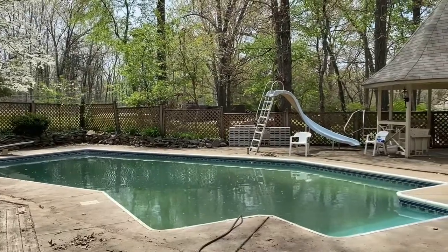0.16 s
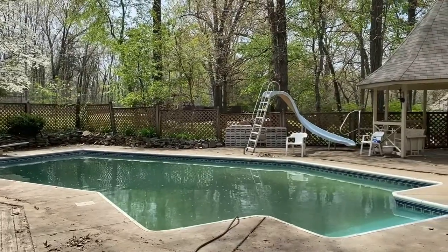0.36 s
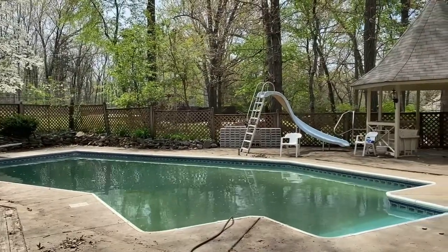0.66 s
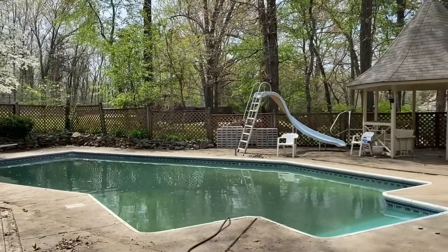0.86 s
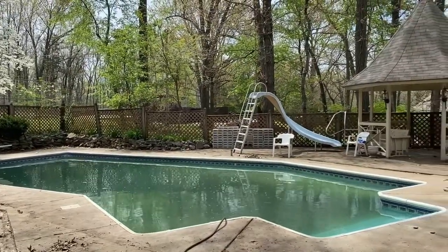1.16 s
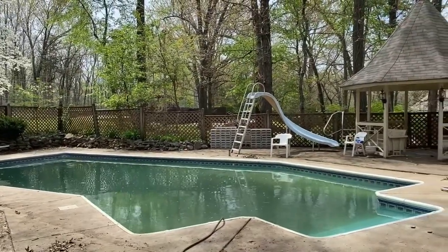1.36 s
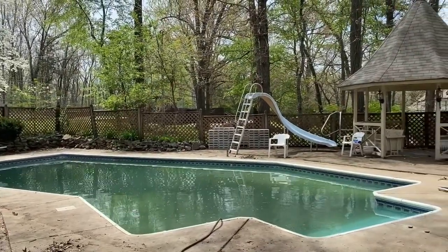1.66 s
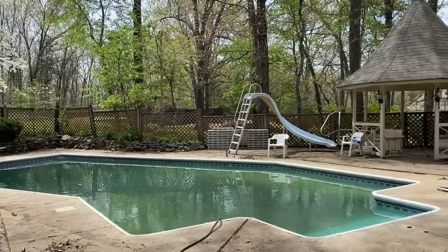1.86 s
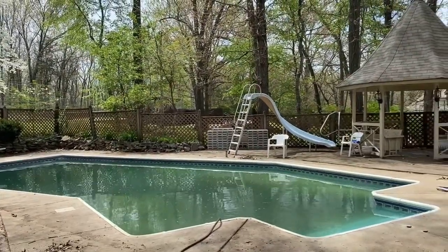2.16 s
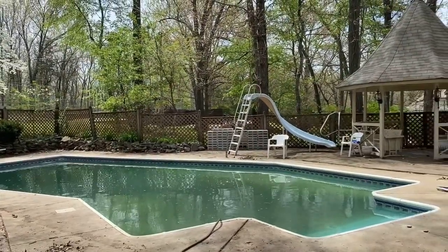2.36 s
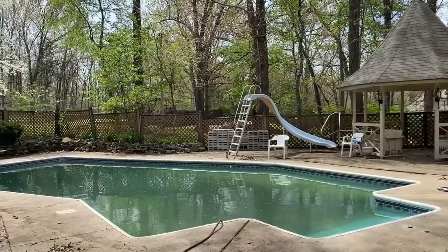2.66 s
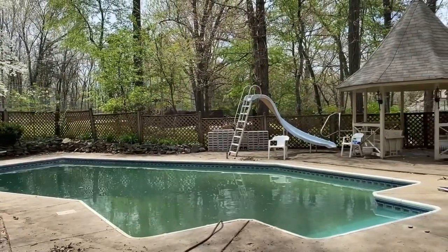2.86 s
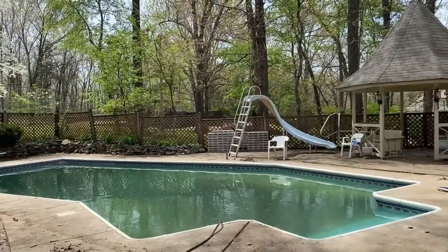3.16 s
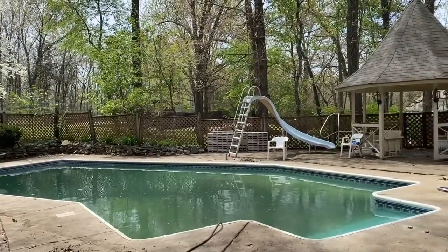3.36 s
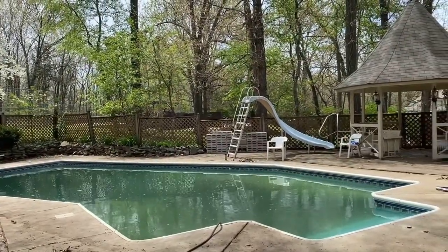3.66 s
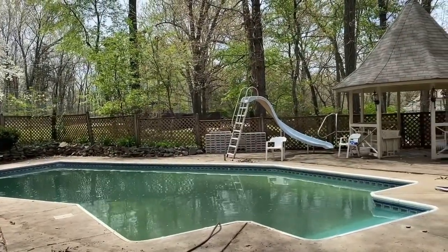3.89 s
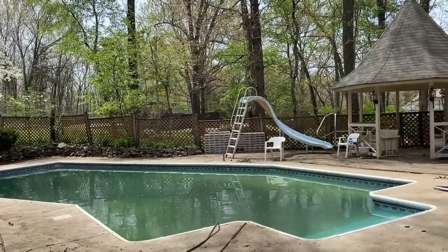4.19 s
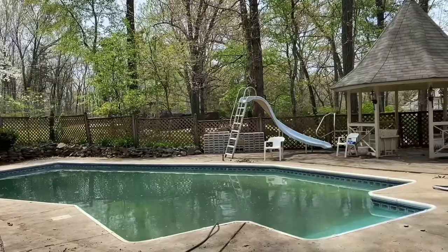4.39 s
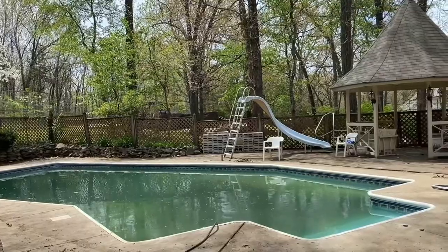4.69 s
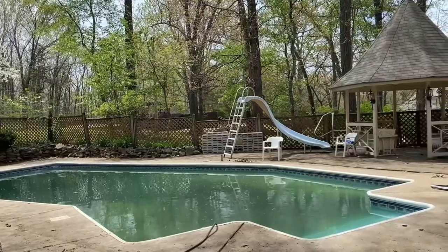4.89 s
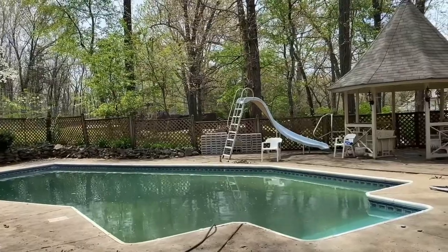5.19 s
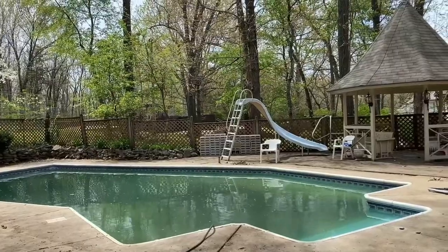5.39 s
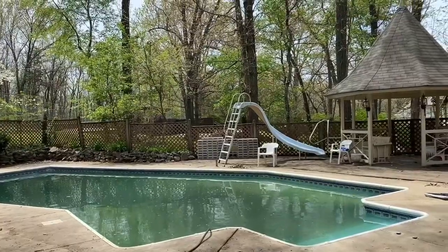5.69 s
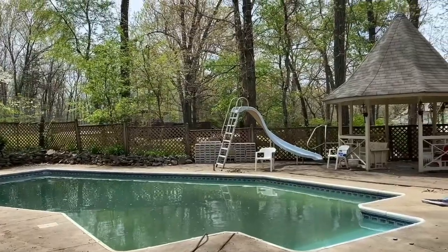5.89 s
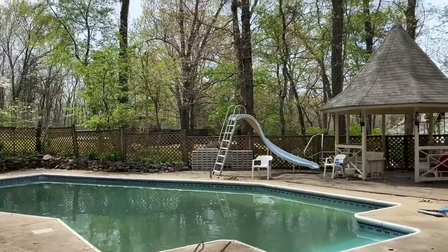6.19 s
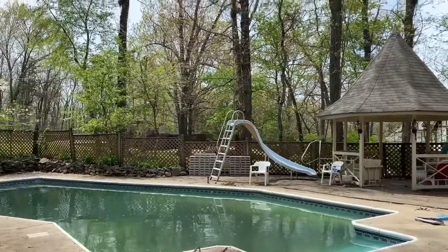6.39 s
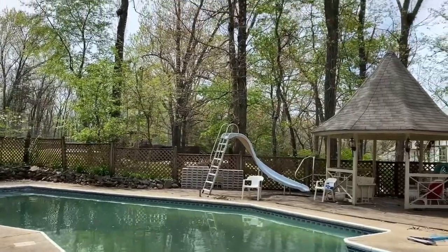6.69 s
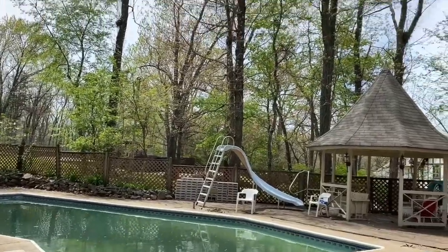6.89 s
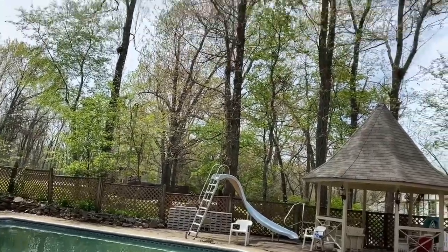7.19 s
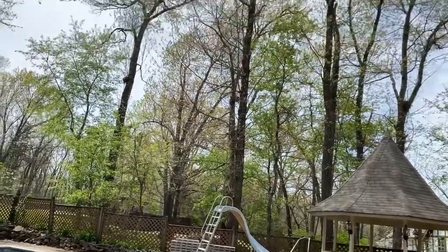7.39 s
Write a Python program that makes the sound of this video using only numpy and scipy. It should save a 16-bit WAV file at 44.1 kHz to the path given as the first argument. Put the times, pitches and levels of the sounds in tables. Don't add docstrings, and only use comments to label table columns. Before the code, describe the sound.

Unbroken, high whistling toad trills, one lower and nearer, one faster and higher, echo off trees above a soft distant engine and traffic rumble.

```python
import sys
import numpy as np
from scipy import signal
from scipy.fft import rfft, irfft, next_fast_len
from scipy.io import wavfile
from scipy.ndimage import uniform_filter1d

SR = 44100
rng = np.random.default_rng(int(sys.argv[2]) if len(sys.argv) > 2 else 0)


def waveform_to_disk(signal):
    frames = np.transpose(np.atleast_2d(signal))
    scaled = np.clip(frames, -1, 1) * 32767
    samples = np.round(scaled).astype(np.int16)
    wavfile.write(sys.argv[1], SR, samples)


def gain_from_db(level_db):
    decades = np.asarray(level_db, float) / 20
    return 10 ** decades


N = 332756

# start_s, left_minus_right_db, toad_overtone_db, far_toad_direct_db
PHONE_SWING = [
    (0, 0, -3, -2),
    (2.3, 0, -2, -1),
    (3, -0.5, 0, 0),
    (6, 0, -1.5, 1.5),
    (6.6, .3, -3, -1),
    (7.0, .7, -8, 5.5),
    (7.55, 2.5, -10, 3.5),
]


def evened(x):
    return x / np.sqrt(np.mean(x ** 2) + 1e-20)


def columns(rows, at):
    key, *rest = np.transpose(rows)
    return [np.interp(at, key, column) for column in rest]


def add(mix, start_s, sound):
    part = mix[round(start_s * SR):][:len(sound)]
    part += sound[:len(part)]


def ports(x, lead_us, pan_db):
    size = next_fast_len(N)
    turn = np.exp(1j * np.pi * np.fft.rfftfreq(size, 1 / SR) * lead_us * 1e-6)
    z = rfft(x, size)
    left = z * turn * gain_from_db(pan_db / 2)
    right = z / turn / gain_from_db(pan_db / 2)
    return irfft(np.array([left, right]), size)[:, :N]


def fuzzy(hz, width_hz):
    noise = [1, 1j] @ rng.standard_normal((2, N))
    slow = signal.lfilter([1], [1, -np.exp(-np.pi * width_hz / SR)], noise)
    carrier = np.exp(2j * np.pi * np.cumsum(hz * np.ones(N)) / SR)
    return evened((slow * carrier).real)


def breeze(t):
    # peak_s, fine_leaves_db, broad_leaves_db
    puffs = [(0.02, 6.5, 4), (1.0, 8, 5.5), (1.561, 6, 0.5), (2.15, 1.5, 2.5), (2.58, 4, 5),
             (3.2, 4.5, 2.5), (3.801, 3, 1), (4.5, 4.5, 2), (5.03, 5.5, 3.5), (5.5, 1, 1), (5.85, 3.5, 4),
             (6.05, 4, 6), (6.23, 4.5, 0.5), (6.45, 5, 5.5), (6.65, 5.5, 5), (7.16, 3, 4), (7.35, 2, -0.5),
             (7.5, 1, -1), (0.38, 1, -0.5), (4.1, 4, 2.5)]
    rise_s, fall_s, flicker_db = 0.061, 0.12, 2.5
    late = t[:, None] - np.transpose(puffs)[0]
    shape = np.exp(-(late / np.where(late < 0, rise_s, fall_s)) ** 2)
    swell_db = shape @ np.array(puffs)[:, 1:]
    flicker = evened(uniform_filter1d(rng.standard_normal((len(t), 2)), size=13, axis=0))
    return (swell_db - swell_db.mean(0) + flicker_db * flicker * [1, .4]).T


def wash(spectrum, patchy_db, gust_db, size):
    # pitch_hz, difference_to_sum_db, phase_radians, share_tied_to_sum (0 to 1)
    port_match = [(40, -58.5, 2.2, 0.62), (122, -21.5, 2.4, 0.65), (288, -12, 3.8, 0.35),
                  (527, -2, 2, 0.19), (995, -2.5, 2.5, 0.12), (2600, -5, 1.8, 0.45), (4970, -1, 1.3, 0.63),
                  (7460, 7, 1.6, .4), (9000, 20, 1.5, 0.071), (11100, 11, 1.6, 0.043),
                  (13600, -0.5, 1.6, .1)]
    frames, hz = 4 * N // size + 5, np.fft.rfftfreq(size, 1 / SR)
    a, b, c, d, patch = rng.standard_normal((frames, len(hz), 5)).T
    patch = uniform_filter1d(patch, size=12, axis=0)
    patch = evened(uniform_filter1d(patch, size=10, axis=1))

    fine_db, broad_db = breeze(np.arange(frames) * size / 4 / SR)
    gust = fine_db * np.interp(hz, [3200, 4800, 7500, 12000], [0, .6, 1, .8])[:, None]
    gust = gust + broad_db * np.interp(hz, [1800, 2600, 3500, 4500], [.3, 1, 1, 0])[:, None]

    def read_by_pitch(rows):
        return columns([(np.log(f), *rest) for f, *rest in rows], np.log(hz + 1)[:, None])

    side_db, angle, tied = read_by_pitch(port_match)
    tied = np.clip(tied, 0, 1)
    mid = a + 1j * b
    side = tied * np.exp(1j * angle) * mid + np.sqrt(1 - tied ** 2) * (c + 1j * d)
    side = gain_from_db(side_db) * side
    level_db = read_by_pitch(spectrum)[0] + patchy_db * patch + gust_db * gust
    z = np.array([mid + side, mid - side]) * gain_from_db(level_db)
    sound = signal.istft(z, nperseg=size, noverlap=3 * size // 4)[1][:, :N]
    return sound / np.sqrt(size) * gain_from_db(21)


def traffic():
    # pitch_hz, level_db (per Hz)
    rumble = [(20, -102.5), (40, -75), (60, -55), (80, -38), (105, -42), (135, -48.5), (165, -50),
              (250, -55), (400, -61.5), (700, -64.5), (1000, -68.5), (1400, -67.5), (2200, -111),
              (4000, -160)]
    return wash(rumble, patchy_db=0.7, gust_db=0, size=2048)


def leaves():
    # pitch_hz, level_db (per Hz)
    hiss = [(900, -97), (1500, -92.5), (2300, -65.5), (3200, -72), (4200, -80), (5200, -80), (6500, -91.5),
            (7700, -100), (8500, -110), (11000, -112), (12500, -111), (14300, -111), (15800, -140)]
    return wash(hiss, patchy_db=2.0, gust_db=1.0, size=512)


def motors():
    # start_s, firing_rate_hz, level_db, double_rate_level_db
    engine_run = [(0, 122, -55, -79), (1.3, 130.1, -51, -74), (2.2, 131.8, -51, -73.5),
                  (3.6, 135.6, -54, -80.5), (5.2, 136.9, -53, -65.5), (6.2, 139, -54.5, -68),
                  (6.32, 140.6, -55, -56), (6.5, 140.8, -53, -53), (6.78, 140.4, -52.5, -56),
                  (6.95, 141.1, -55.5, -64.5), (7.55, 139.9, -49.5, -63)]
    # pitch_hz, width_hz, level_db
    pump_tones = [
        (60.53, 17, -48),
        (345.8, 10, -64),
        (635, 6.5, -73),
        (697, 3.5, -81),
    ]
    t = np.arange(N) / SR
    hz, first_db, second_db = columns(engine_run, t)
    double = np.sin(4 * np.pi * np.cumsum(hz) / SR) + 0.22 * fuzzy(2 * hz, 9)
    hum = gain_from_db(first_db) * fuzzy(hz, 6.5) + gain_from_db(second_db) * double
    for pitch_hz, width_hz, db in pump_tones:
        steady = np.sin(2 * np.pi * pitch_hz * t)
        hum = hum + gain_from_db(db) * (0.75 * fuzzy(pitch_hz, width_hz) + 0.65 * steady)
    return signal.sosfilt(signal.butter(4, [42, 1200], "band", fs=SR, output="sos"), hum)


def trees(x):
    # pitch_hz, time_to_fall_60_db_s
    ring_times = [(1000, 0.12), (2000, 0.32), (7000, 0.36)]
    ahead = SR // 3
    x = np.concatenate([x[ahead:0:-1], x])
    out, t = np.zeros((2, N)), np.arange(len(x)) / SR

    def sparse(rows):
        return rng.choice([-1., 1.], (rows, SR)) * (rng.random((rows, SR)) < .05)

    for k in range(3):
        taps = sparse(1) + 0.39 * sparse(2)
        taps[:, :SR // 50] = 0
        hz, late_s, z = signal.stft(taps, SR, nperseg=256)
        fade_db = -60 * late_s / columns(ring_times, hz)[0][:, None]
        tail = signal.istft(z * gain_from_db(fade_db), SR, nperseg=256)[1]
        tail = tail / np.linalg.norm(tail[0])
        turn = np.sqrt(2 / 3) * np.cos(2 * np.pi * (0.463 * t + k / 3))
        out += signal.fftconvolve((x * turn)[None], tail, axes=1)[:, ahead:ahead + N]
    return out


def piping_bird():
    # start_s, length_s, level_db, pitch_hz
    bird_notes = [(0.0, 0.071, -57.5, 2450), (0.08, .075, -61, 2440), (0.152, 0.056, -54.5, 2473),
                  (.21, .04, -62, 2420), (0.273, 0.11, -57, 2464), (.415, 0.027, -58, 2480),
                  (0.453, 0.084, -57, 2444), (0.528, 0.089, -63, 2420), (.615, .075, -57, 2465),
                  (4.001, 0.1, -60, 2480), (4.131, .13, -59, 2435), (4.271, 0.039, -54, 2360),
                  (4.328, 0.1, -58.5, 2445), (4.437, 0.028, -60, 2420), (4.475, 0.06, -54.5, 2420),
                  (4.549, 0.1, -60, 2430), (4.641, 0.08, -55, 2420), (4.747, 0.07, -60, 2390),
                  (4.823, 0.062, -55.5, 2420), (7.11, 0.082, -58, 2415), (7.223, 0.092, -62.5, 2380),
                  (7.322, 0.11, -58, 2420), (7.452, 0.025, -52, 2470), (7.485, .06, -59, 2440)]
    edge_s, throb_hz, throb_depth, wobble_hz = .006, 44, .35, 10
    out = np.zeros(N)
    for start_s, length_s, db, hz in bird_notes:
        t = np.arange(0, length_s, 1 / SR)
        wander = evened(uniform_filter1d(rng.standard_normal(SR // 5), size=700))[:len(t)]
        throb = 1 + throb_depth * np.sin(2 * np.pi * (throb_hz * t + rng.random()))
        edges = np.clip(np.minimum(t, length_s - t) / edge_s, 0, 1)
        whistle = np.sin(2 * np.pi * np.cumsum(hz + wobble_hz * wander) / SR)
        add(out, start_s, gain_from_db(db) * throb * edges * whistle)
    return out


def chipping_bird():
    # start_s, peak_db
    chip_calls = [
        (0.798, -62.5),
        (1.548, -72),
        (2.4718, -65.5),
        (3.624, -64.5),
        (4.829, -62.5),
        (5.775, -64),
    ]
    out, u = np.zeros(N), np.linspace(0, 1, num=440)
    sweep = np.sin(2 * np.pi * np.cumsum(5800 + 1900 * u) / SR) * np.sin(np.pi * u)
    for start_s, db in chip_calls:
        add(out, start_s, gain_from_db(db) * sweep)
    return out


def bubble(hz, cycles, glide):
    u = np.arange(round(3 * cycles * SR / hz)) * hz / SR / cycles
    ring = np.sin(2 * np.pi * cycles * u * (1 + glide * u))
    return ring * np.exp(-2.3 * u) * (1 - np.exp(-14 * u)) * 1.8


def water(per_s, small_db, spread_db):
    # start_s, peak_db, pitch_hz
    plop_list = [(0.3275, -59, 2620), (0.373, -46.5, 3280), (0.539, -51, 2760), (0.9482, -56, 3290),
                 (2.341, -47, 3240), (2.341, -45, 2830), (2.531, -47.5, 3260), (2.532, -45, 2830),
                 (2.554, -48.5, 2760), (2.738, -50, 3220), (2.946, -54, 3300), (3.248, -48, 3210),
                 (4.129, -52, 2850), (4.212, -53, 3300), (4.512, -41.5, 2670), (4.7616, -55, 3400),
                 (6.402, -49.5, 3010), (.447, -51, 3250), (1.5374, -60.5, 2890), (2.901, -53.5, 3200),
                 (3.03, -50, 2650), (4.9297, -60, 2640), (5.7412, -55.5, 3200), (6.302, -52, 2570),
                 (6.6513, -59, 2690), (7.011, -61, 2710)]
    # start_s, peak_db, pitch_hz
    drip_list = [(0.2423, -63, 4920), (0.3262, -59, 4020), (0.373, -51, 4010), (0.4464, -62, 3860),
                 (0.6446, -59, 3970), (0.8325, -52, 4690), (1.0138, -55, 4800), (1.3394, -61.5, 5150),
                 (1.3643, -60, 4800), (1.5492, -54, 4500), (1.5753, -62, 4500), (1.7355, -54, 3880),
                 (1.7864, -58, 3840), (1.8286, -52.5, 4070), (1.954, -56, 3840), (2.15, -58, 3940),
                 (2.2687, -62, 4770), (2.3411, -59, 3890), (2.4304, -53, 4310), (2.8974, -58, 3830),
                 (3.0799, -59, 3860), (3.3473, -57, 4000), (3.4144, -51, 3930), (3.6541, -52.5, 4030),
                 (3.7233, -52, 3980), (3.7943, -55, 4030), (4.1021, -53.5, 3950), (4.132, -53, 5100),
                 (4.1769, -56, 4010), (4.2107, -58, 3900), (4.2951, -57, 4600), (4.35, -56, 3940),
                 (4.4282, -55.5, 3850), (4.5406, -60, 3870), (4.6284, -65, 4000), (4.7363, -57.5, 3860),
                 (4.7888, -54, 3940), (5.098, -55, 3920), (5.25, -56, 4000), (5.3394, -53, 5240),
                 (5.3617, -60, 3910), (5.4595, -56, 4600), (5.5428, -52, 4120), (5.6575, -58, 3870),
                 (5.7412, -64, 3930), (5.9713, -53, 3850), (6.1222, -60.5, 4150), (6.2018, -59.5, 4930),
                 (6.2223, -53.5, 5100), (6.2513, -58, 5070), (6.2754, -56, 3810), (6.5168, -49.5, 4260),
                 (6.8139, -54.5, 3840), (7.0783, -65, 5180), (7.1846, -56, 3810), (7.411, -54, 5600)]
    out = np.zeros(N)
    for start_s, db, hz in plop_list:
        glide = rng.uniform(.3, 1) * .08 * (2600 / hz) ** 2
        add(out, start_s, gain_from_db(db - 6) * bubble(hz, 26, glide))
    for start_s, db, hz in drip_list:
        add(out, start_s, gain_from_db(db - 3) * bubble(hz, 17, rng.uniform(-0.026, 0.032)))
    for when, pitch, size, glide in rng.random((round(per_s * N / SR), 4)):
        hz = 2500 * (5600 / 2500) ** pitch
        db = small_db - spread_db * max(np.log(size + 1e-9), -2)
        drop = bubble(hz, 12, .06 * glide - .02) * (3000 / hz) ** .8
        add(out, when * N / SR, gain_from_db(db) * drop)
    return out


def fingers():
    # start_s, peak_db, left_minus_right_db
    tick_list = [(.5, -88, 0), (2.398, -88, 0), (3.611, -84, 1), (4.816, -80, 1), (5.1, -81, -1),
                 (5.152, -76, 0), (5.231, -79, 0), (5.249, -69, -1), (5.258, -74, -1), (5.809, -74, 1),
                 (6.023, -84, -1), (6.516, -68, 0), (7.411, -73, 0)]
    # start_s, peak_db, pitch_hz, ring_ms
    knock_list = [
        (4.7, -45, 540, 1.7),
        (5.336, -53, 240, 16),
        (6.5167, -48, 5900, 0.7),
        (5.2, -56, 5600, .45),
        (7.4, -59, 11000, 0.23),
        (7.4117, -40.5, 850, 0.76),
        (5.3, -44.5, 2300, 0.46),
        (6.8, -52.5, 4500, .4),
        (6.5, -58.5, 6000, .3),
        (7.4111, -60.5, 10000, 0.33),
    ]
    out, t = np.zeros((2, N)), np.arange(1300) / SR
    bright = signal.butter(2, [11500, 16000], "band", fs=SR)
    fade = np.exp(-t / .0012) + .05 * np.exp(-t / .007)
    for start_s, db, pan_db in tick_list:
        left, other = rng.standard_normal((2, len(t))) * fade
        for k, tick in enumerate([left, .8 * other + .3 * left]):
            level = gain_from_db(db + 8 + pan_db * (.5 - k))
            add(out[k], start_s, level * (signal.lfilter(*bright, tick) + .4 * tick))
    for start_s, db, hz, ring_ms in knock_list:
        ring = np.sin(2 * np.pi * hz * t) * np.exp(-t / ring_ms * 1e3)
        for k in range(2):
            add(out[k], start_s, gain_from_db(db + 4.5 - 3.3 * k) * ring)
    return out


def toad(beat, voice, pulse, echoes, jitter_ms, uneven_db, second_db, third_db, facing):
    lead = 2205
    start_s, count = np.transpose(beat)
    chance = rng.standard_normal((int(count[-1] - count[0]) + 1, 4))
    beats = np.interp(np.arange(count[0], count[-1] + 1), count, start_s)
    beats = beats + jitter_ms * 1e-3 * chance[:, 0]
    t = np.arange(-lead, N) / SR
    k = np.clip(np.searchsorted(beats + pulse[0][0] * 0.00092, t) - 1, 0, None)
    shape_db, shift_hz = columns(pulse, (t - beats[k]) * 1e3)
    effort_db, hz = columns(voice, t)
    _, overtone_db, direct_db = columns(PHONE_SWING, t)

    turn = 2 * np.pi * np.cumsum(hz + shift_hz + 3.6 * chance[k, 1]) / SR
    turn -= turn[np.searchsorted(k, k)]
    second = gain_from_db(second_db + overtone_db + 2.0 * chance[k, 3] - .105 * shift_hz)
    tone = np.sin(turn) + second * np.cos(2 * turn) + gain_from_db(third_db) * np.sin(3 * turn)
    shape = np.clip(gain_from_db(shape_db) - gain_from_db(pulse[0][1]), 0, 1) * gain_from_db(uneven_db * chance[k, 2])
    song = uniform_filter1d(shape, size=40) * tone
    song = signal.sosfilt(signal.butter(8, 5600, fs=SR, output="sos"), song)

    taps = np.zeros(SR // 20)
    for delay_ms, db in echoes:
        taps[round(delay_ms * 1e-3 * SR)] = gain_from_db(db)
    heard = song * gain_from_db(facing * direct_db) + signal.oaconvolve(song, taps)[:len(t)]
    return gain_from_db(effort_db[lead:]) * evened(heard)[lead:]


def far_toad():
    # start_s, pulses_sung_so_far
    far_beat = [(-0.0273, -2), (0.3128, 11), (1.0535, 39), (2.127, 79), (2.6524, 99), (3.0766, 115),
                (3.7325, 139), (4.0709, 151), (4.294, 159), (5.1725, 191), (5.3955, 199), (5.7394, 211),
                (6.0888, 223), (6.3262, 231), (6.5562, 239), (6.8935, 251), (7.1129, 259), (7.684, 279)]
    # start_s, effort_db, sac_pitch_hz
    far_voice = [
        (0, -43, 1944),
        (2.2, -43, 1960),
        (4.099, -43, 1950),
        (5.2, -43, 1962),
        (6.35, -44, 1928),
        (6.6, -42.5, 1949),
        (7.0, -45.5, 1982),
        (7.55, -45.5, 1962),
    ]
    # after_beat_ms, level_db, pitch_shift_hz
    far_pulse = [
        (-23.5, -35, 20),
        (-20.7, -14, 30),
        (-18.5, -2.2, 18),
        (-15, 0, 28),
        (-12.7, -1.6, 0),
        (-10.9, -7, 25),
        (-9, -35, 60),
    ]
    # delay_ms, level_db
    far_echoes = [
        (12.56, -3.9),
        (17.28, 0),
    ]
    return toad(far_beat, far_voice, far_pulse, far_echoes, jitter_ms=.35, uneven_db=0.19,
                second_db=-31.0, third_db=-62.5, facing=1)


def near_toad():
    # start_s, pulses_sung_so_far
    near_beat = [(-0.0366, -1), (0.1157, 4), (0.483, 16), (1.1022, 36), (1.6003, 52), (2.107, 68),
                 (3.3913, 108), (3.9017, 124), (4.4174, 140), (4.807, 152), (5.202, 164), (5.4614, 172),
                 (5.8455, 184), (5.9746, 188), (6.369, 200), (6.6297, 208), (7.1573, 224), (7.5608, 236)]
    # start_s, effort_db, sac_pitch_hz
    near_voice = [
        (0.0, -40, 1731),
        (1.029, -38.5, 1734),
        (1.66, -39.5, 1732),
        (4.18, -39, 1721),
        (4.6, -40.5, 1728),
        (4.809, -40, 1721),
        (7.308, -37.5, 1714),
        (7.55, -39, 1714),
    ]
    # after_beat_ms, level_db, pitch_shift_hz
    near_pulse = [
        (-10.7, -40, -158),
        (-9.93, -16.1, -34),
        (-8.77, -1.7, -37),
        (-2.62, -1.2, -16),
        (-1.61, -1.2, 6),
        (.59, 0, 8),
        (4.48, 0, -9),
        (5.23, -5.3, -128),
        (5.97, -40, -84),
    ]
    # delay_ms, level_db
    near_echoes = [
        (5.16, -13.1),
        (7.42, -12.6),
        (10.25, -18),
        (14.86, -17.7),
    ]
    return toad(near_beat, near_voice, near_pulse, near_echoes, jitter_ms=.2, uneven_db=0.13,
                second_db=-30.5, third_db=-46.0, facing=0)


def scene():
    near, far = near_toad(), far_toad()
    piping, chip = piping_bird(), chipping_bird()
    drops = water(per_s=72, small_db=-70.5, spread_db=4.0)
    direct = ports(near, lead_us=26, pan_db=0.13) + ports(far, lead_us=65, pan_db=1.0)
    direct += ports(piping, lead_us=41, pan_db=2.2) + ports(chip, lead_us=50, pan_db=1.5)
    direct += ports(drops, lead_us=27, pan_db=-.3)
    swing_db = columns(PHONE_SWING, np.arange(N) / SR)[0]
    direct = direct * gain_from_db(np.outer([.5, -.5], swing_db))
    to_trees = gain_from_db(-11.5) * near + gain_from_db(-15.5) * far
    to_trees += gain_from_db(-10.5) * piping + gain_from_db(-8.5) * drops + gain_from_db(-5.0) * chip
    return direct + trees(to_trees) + motors() + traffic() + leaves() + fingers()


def band_limit(x):
    return signal.sosfilt(signal.butter(12, 15800, fs=SR, output="sos"), x)


def record(dry):
    mid, side = (dry[0] + dry[1]) / 2, (dry[0] - dry[1]) / 2
    size = next_fast_len(N)
    hz = np.fft.rfftfreq(size, 1 / SR)
    thin_db = np.interp(hz, [8100, 8700, 11000, 12500], [0, -7, -8, -2.5])
    mid = irfft(rfft(mid, size) * gain_from_db(thin_db), size)[:N]
    ending = np.clip((N - 55 - np.arange(N)) / 8, 0, 1)
    mix = np.array([mid + side, mid - side]) * ending
    return band_limit(mix)


dry = scene()
out = record(dry)
waveform_to_disk(out)
```